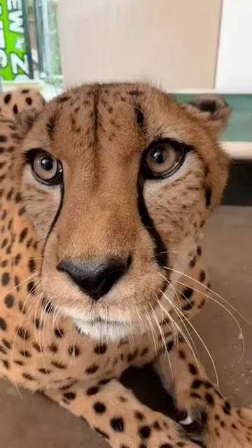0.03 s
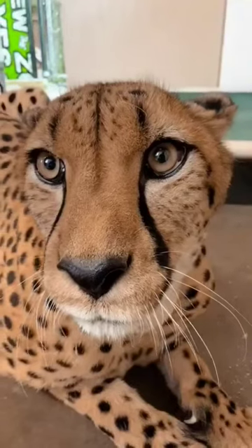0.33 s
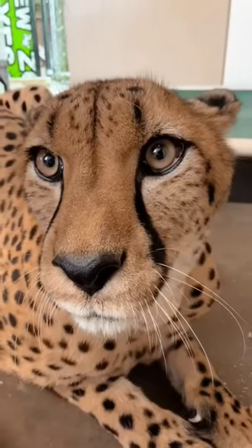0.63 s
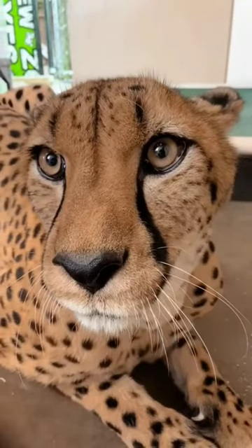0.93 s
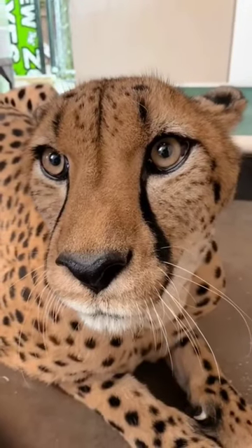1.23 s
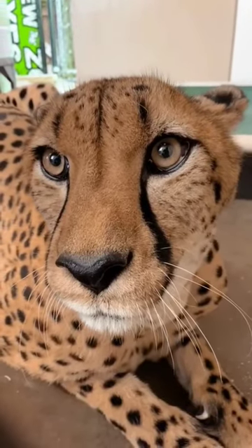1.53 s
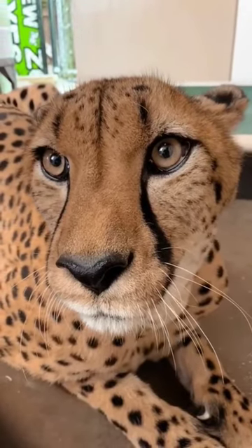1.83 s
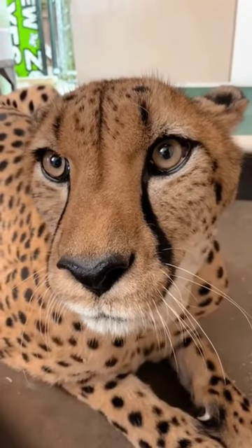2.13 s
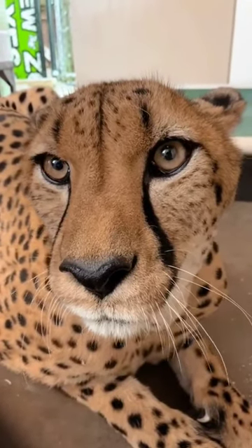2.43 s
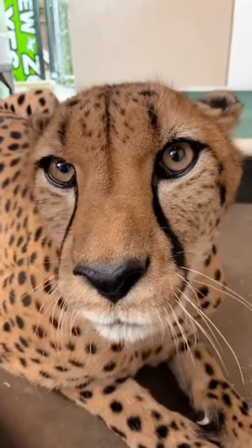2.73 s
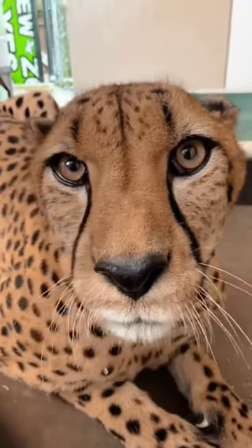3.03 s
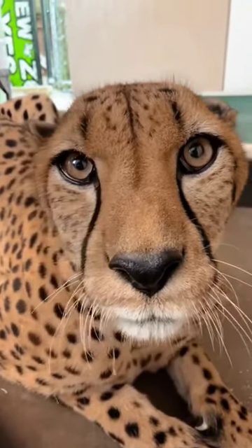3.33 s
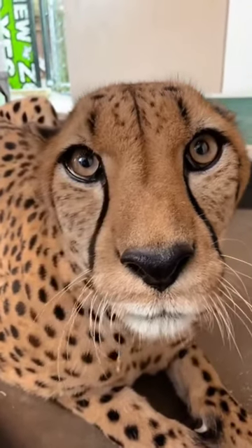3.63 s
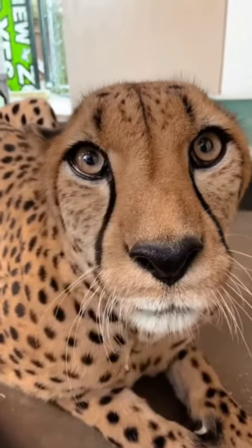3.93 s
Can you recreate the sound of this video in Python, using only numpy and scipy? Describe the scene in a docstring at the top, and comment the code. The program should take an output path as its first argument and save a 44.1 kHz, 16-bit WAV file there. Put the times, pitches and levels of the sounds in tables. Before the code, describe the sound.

Deep, rattling purring comes from a cheetah right by the microphone: a strong breath in with a few wet clicks, a long, gentler humming breath out, and a strong breath in again. Nearby walls add a slight echo.

```python
"""A cheetah purring

A cheetah purrs close by in a small hard-walled enclosure: a loud stroke of breath in, a long soft
stroke out, and in again. Its voice box snaps 22-26 times a second. Each of these pulses is a short
falling note in the throat, a puff of rasping air and a chest thump. On the slower outward stroke
the third harmonic (three times the pulse rate) meets a deep resonance and swells into a hum."""
import sys
import numpy as np
from scipy import signal
from scipy.fft import rfft, irfft, next_fast_len
from scipy.io import wavfile
from scipy.ndimage import uniform_filter1d

SR = 44100
rng = np.random.default_rng(int(sys.argv[2]) if len(sys.argv) > 2 else 0)


def inscribe(sig):
    """Save sig as 16-bit PCM at rate SR to the path in sys.argv[1].

    A 1-D sig is mono; a 2-D sig holds one channel per row.
    Samples are clipped to [-1, 1] before scaling.
    """
    pcm = np.round(np.clip(np.atleast_2d(sig).T, -1, 1) * 32767)
    wavfile.write(sys.argv[1], SR, pcm.astype(np.int16))


N = 176400  # 4 seconds
PULSE_TIME = np.arange(-1400, 1800) / SR  # seconds before and after one pulse


def amp(db):
    """Turns decibels into a gain."""
    return 10 ** (np.asarray(db) / 20)


def at_pitch(table, hz):
    """Looks up a table by frequency, blending between its rows on a log scale."""
    row_hz, value = np.transpose(table)
    return np.interp(np.log(hz + 1), np.log(row_hz + 1), value)


def add(mix, start_s, sound):
    """Mixes a sound in at the given time."""
    part = mix[..., max(round(start_s * SR), 0):][..., :sound.shape[-1]]
    part += sound[..., :part.shape[-1]]


def unit_pulse(x):
    """Scales a pulse so that 23 of them a second have an average (rms) level of 1."""
    return x / np.sqrt(np.sum(x ** 2) * 23 / SR + 1e-20)


def colour(x, table, size=4096):
    """Gives a sound a tone colour. The table sets the filter's shape, not its overall gain."""
    log_gain = np.log(amp(at_pitch(table, abs(np.fft.fftfreq(size, 1 / SR)))))
    spectrum = np.exp(np.conj(signal.hilbert(log_gain)))  # rings after a sound, never before
    taps = np.fft.ifft(spectrum).real[:size // 2]
    return signal.oaconvolve(np.atleast_2d(x), taps[None] / np.linalg.norm(taps), axes=1)[:, :N]


def swell(at_s, rise_s, fall_s):
    """The loudness of one puff: a rounded rise, then a fade."""
    t = PULSE_TIME - at_s
    return np.exp(-(np.minimum(t, 0) / rise_s) ** 2 - np.maximum(t, 0) / fall_s)


def air(likeness=0.83):
    """The noise of swirling air, nearly alike on the left and right."""
    shared, side = rng.standard_normal((2, N))
    return np.sqrt((1 + likeness) / 2) * shared + np.sqrt((1 - likeness) / 2) * np.array([side, -side])


def muffled(x):
    """Fur and flesh let only the low sounds out of the body."""
    return signal.sosfilt(signal.butter(2, 1500, fs=SR, output="sos"), x)


# How long the walls echo. Each row: frequency in Hz, seconds to fade by 60 dB.
ECHO_FADE = [(100, 0.55), (350, 1), (2000, 0.72), (12000, 0.29)]


def enclosure(x, delay_s=0.0072):
    """Scattered echoes from near walls, each pitch dying at its own speed."""
    count = SR // 40
    echoes = np.zeros((2, SR))
    arrivals = round(delay_s * SR) + 20 * np.arange(count) + rng.integers(0, 20, (2, count))
    np.put_along_axis(echoes, arrivals, rng.choice([-1., 1.], arrivals.shape), 1)
    hz, t, bands = signal.stft(echoes, SR, nperseg=256)
    likeness = at_pitch([(200, 1.0), (400, 0.69), (800, 0.13)], hz)[:, None]
    bands[1] = likeness * bands[0] + np.sqrt(1 - likeness ** 2) * bands[1]  # lows reach both sides alike
    fade = amp(-60 * t / at_pitch(ECHO_FADE, hz)[:, None])
    tail = signal.istft(bands * fade, SR, nperseg=256)[1]
    return signal.fftconvolve(x, tail / np.linalg.norm(tail[0]), axes=1)[:, :N]


# How loud the breath is. Each row: time in seconds, level in dB.
BREATH_LEVEL = [(0.301, -52), (1.0, -47.5), (1.201, -59), (2.849, -50.5), (3.05, -64), (3.3, -52.5)]
# The tone of the breath. Each row: frequency in Hz, relative level in dB.
BREATH_COLOUR = [(330, 0.5), (800, -8), (1300, -19.5), (2000, -18), (2400, -29.5), (3800, -26), (4500, -40),
                 (15000, -55)]


def breath():
    """A soft, steady rush of air that joins the strokes."""
    level_db = np.interp(np.arange(N) / SR, *np.transpose(BREATH_LEVEL))
    return amp(level_db) * colour(air(), BREATH_COLOUR)


# How hard the pulses push the hum. Each row: time in seconds, relative strength in dB.
HUM_PUSH = [(.3, -36.5), (.86, -38), (.93, -24), (1.03, -29.5), (1.22, -43), (1.4, -32), (1.85, -28.5),
            (2.5, -29.5), (2.88, -27), (2.93, -34), (4, -39)]
# A higher tone that sinks and swells as the outward stroke ends.
# Each row: time in seconds, pitch in Hz, push in dB compared with the deep hum's.
HUM_OVERTONE = [(1.4, 172, -9), (2.6, 168, -13), (2.74, 160, -5), (2.95, 160, -8)]


def hum(pulse_times, deep_hz=66.15, deep_width_hz=4.76, overtone_width_hz=12, lag_s=0.0048):
    """The pulses keep a deep resonance and a weaker, drifting overtone ringing."""
    t = np.arange(N) / SR
    pushes = np.zeros(N)
    for s in pulse_times:
        add(pushes, s + lag_s, amp([np.interp(s, *np.transpose(HUM_PUSH))]))
    ring = np.exp(-np.pi * deep_width_hz * t) * np.sin(2 * np.pi * deep_hz * t)
    deep = signal.oaconvolve(pushes, ring)[:N]
    row_s, hz, db = np.transpose(HUM_OVERTONE)
    spin = np.exp(2j * np.pi * np.cumsum(np.interp(t, row_s, hz)) / SR)
    decay = np.exp(-np.pi * overtone_width_hz / SR)
    overtone = spin * signal.lfilter([1], [1, -decay], pushes * amp(np.interp(t, row_s, db)) / spin)
    return muffled(amp(2.0) * (deep + overtone.imag))


# The tone of the chest. Each row: frequency in Hz, relative level in dB.
CHEST_COLOUR = [(25, -34), (43, 1), (62, 1), (85, 6.5), (120, 1), (165, 2), (225, -14), (400, -26),
                (1500, -82.5)]


def chest(thumps, flutter):
    """Thumps and a fluttering rumble, heard through the body."""
    return muffled(colour(thumps + flutter * rng.standard_normal(N), CHEST_COLOUR))


# Sharper snaps on the inward strokes.
# Each row: time in seconds, then relative levels in dB of the burst and of the knock.
WET_SNAPS = [(0.3037, -17.5, -18.5), (0.4311, -18.5, -23.5), (0.5555, -20.5, -23), (0.639, -26.5, -21),
             (3.2534, -20.5, -32.5), (3.62, -20.5, -28.5), (3.701, -22, -23)]


def wet_snaps(knock_hz=720):
    """Brief, bright, wet bursts on the hardest pulses, each with a hollow knock in the mouth."""
    bursts, knocks = np.zeros((2, N))
    shape = swell(at_s=0, rise_s=.0019, fall_s=.0021)
    knock = shape * np.sin(2 * np.pi * knock_hz * PULSE_TIME)
    for s, burst_db, knock_db in WET_SNAPS:
        add(bursts, s + PULSE_TIME[0], amp(burst_db) * shape)
        add(knocks, s + PULSE_TIME[0], amp(knock_db) * knock)
    bright = [(400, -26.5), (1050, 10), (2000, 6.5), (4300, 10.5), (5500, -18.5), (7500, -19.5),
              (9200, -16.5), (10300, -9), (13500, -28), (15500, -34.5)]
    return knocks + amp(-13.5) * colour(bursts * air(), bright)


def wet_air(grain_db=4.5):
    """Air swirling through a moist passage, broken into grains under a millisecond long."""
    grain = uniform_filter1d(rng.standard_normal(N), size=30)
    gain = amp(grain_db * grain / grain.std())
    return air() * gain / np.sqrt(np.mean(gain ** 2))


def shifting_passage(x, depth_db=2.4):
    """The moist passage keeps changing shape, so random peaks come and go in the tone."""
    bands = signal.stft(x, nperseg=256)[2]
    patches = uniform_filter1d(rng.standard_normal(bands.shape[1:]), size=4, axis=0)  # across pitch
    patches = uniform_filter1d(patches, size=7, axis=1)  # across time
    gain = amp(depth_db * patches / patches.std())
    return signal.istft(bands * gain / np.sqrt(np.mean(gain ** 2)), nperseg=256)[1][:, :N]


def rasp(puffs, rasp_colour):
    """Puffs of rasping air, and a smoother hiss from the nose that follows their average strength."""
    average = np.sqrt(abs(uniform_filter1d(puffs ** 2, size=1900)))
    treble_only = signal.butter(3, 9000, "highpass", fs=SR, output="sos")
    hiss = signal.sosfilt(treble_only, average * rng.standard_normal((2, N)))
    return shifting_passage(colour(puffs * wet_air() + amp(1.5) * hiss, rasp_colour))


def note(hz, glide, glide_s, loudness):
    """The ring after a snap of the voice box: it starts high and settles on its pitch."""
    settling = np.exp(np.clip((PULSE_TIME + glide_s) / glide_s * 2, -30, 30))
    turns = np.cumsum(hz * (1 + glide / (1 + settling))) / SR
    return loudness * np.cos(2 * np.pi * (turns - np.interp(0, PULSE_TIME, turns)))


def pulse_in(chance):
    """One inward pulse: air leaks in, swells and is cut off with a click."""
    detune = .028 * chance[0]
    throat_note = note(354 * (1 + detune), glide=0.033, glide_s=0.00054,
                       loudness=swell(at_s=0.00099, rise_s=0.004, fall_s=0.0046))
    mouth_note = note(735 * (1 - detune), glide=0.02, glide_s=0.009,
                      loudness=swell(at_s=-0.00092, rise_s=0.0024, fall_s=0.00086))
    leak = amp(4 * chance[1]) * swell(at_s=-0.016 + 0.0032 * chance[2], rise_s=0.0045, fall_s=0.017)
    mouth_puff = swell(at_s=-0.00024, rise_s=0.0026, fall_s=0.0019) + 0.1 * leak
    rasp_puff = swell(at_s=-0.0016, rise_s=0.0067, fall_s=0.0027) + 0.13 * leak
    click_s, click_size = -0.0008 + .001 * chance[2], 0.55
    return throat_note, amp(-8.5) * unit_pulse(mouth_note), mouth_puff, rasp_puff, click_s, click_size


def pulse_out(chance):
    """One outward pulse: an opening click, falling notes in throat and mouth, a small closing puff."""
    tuning = 1 + .014 * chance[0]
    throat_note = note(315 * tuning, glide=0.35, glide_s=0.0044,
                       loudness=swell(at_s=-0.0012, rise_s=0.0017, fall_s=0.0041))
    mouth_note = note(760 * tuning, glide=0.12, glide_s=0.005,
                      loudness=swell(at_s=-0.0032, rise_s=0.001, fall_s=0.0028))
    opening = swell(at_s=-0.0024, rise_s=0.0075, fall_s=0.0021)
    closing = swell(at_s=0.026, rise_s=0.0066, fall_s=0.015)
    mouth_puff, rasp_puff = opening + closing / 2, opening + 0.55 * closing
    click_s, click_size = -0.0044, 1.3
    return throat_note, amp(-3.5) * unit_pulse(mouth_note), mouth_puff, rasp_puff, click_s, click_size


def voice_box_times(rate, end_s):
    """The moments when the voice box snaps, once in each cycle of its changing rate."""
    t = np.arange(rate[0][0], end_s, 1 / SR)
    cycles = np.cumsum(np.interp(t, *np.transpose(rate))) / SR
    return np.interp(np.arange(int(cycles[-1]) + 1), cycles, t)


# The tone of air puffing through the mouth. Each row: frequency in Hz, relative level in dB.
MOUTH_COLOUR = [(150, -33), (300, -4.5), (540, -7.5), (770, -2), (900, -26), (1080, -11.5), (1300, -30),
                (4000, -69)]


def stroke(rate, strength, pulse, rasp_colour, end_s, thump_lead_s, flutter_db):
    """One breath of purring, each pulse a little different. Gives the sound and the pulse times."""
    notes, mouth_puffs, rasp_puffs, clicks, thumps, flutter = np.zeros((6, N))
    row_s, *levels = np.transpose(strength)
    times = voice_box_times(rate, end_s)
    tick = unit_pulse(np.ones(1))
    flutter_shape = unit_pulse(swell(at_s=0, rise_s=0.045, fall_s=0.048))
    played = []
    for s, (late, loud, raspy, heavy, *chance) in zip(times, rng.standard_normal((len(times), 7))):
        throat_db, mouth_db, rasp_db, thump_db = [np.interp(s, row_s, db) for db in levels]
        throat_note, mouth_note, mouth_puff, rasp_puff, click_s, click_size = pulse(chance)
        s += .0003 * late
        played.append(s)
        start = s + PULSE_TIME[0]
        add(notes, start, amp(throat_db + .7 * loud) * unit_pulse(throat_note))
        add(notes, start, amp(mouth_db + 1.2 * raspy) * mouth_note)
        add(mouth_puffs, start, amp(mouth_db + .7 * loud) * unit_pulse(mouth_puff))
        rasp_gain = amp(rasp_db + 1.2 * raspy) / np.hypot(1, click_size)  # shared by puff and click
        add(rasp_puffs, start, rasp_gain * unit_pulse(rasp_puff))
        add(clicks, s + click_s, rasp_gain * click_size * tick)
        thump = amp(thump_db + .7 * heavy) * tick
        add(thumps, s - thump_lead_s, thump)
        add(thumps, s - thump_lead_s + 0.02323, 0.16 * thump)  # a weaker thump on closing
        add(flutter, start, amp(thump_db + flutter_db) * flutter_shape)
    mouth = amp(-5.5) * colour(mouth_puffs * air(), MOUTH_COLOUR)
    voice = notes + mouth + rasp(rasp_puffs, rasp_colour) + colour(clicks, rasp_colour)
    return voice + chest(thumps, flutter), played


def softer_hiss(table, cut_db):
    """Turns down the hiss of the nose, above 6000 Hz, in a tone colour."""
    return [(hz, db - cut_db * (hz > 6000)) for hz, db in table]


# How fast the voice box snaps in each stroke. Each row: time in seconds, pulses per second.
FIRST_IN_RATE = [(0.3045, 23.48), (0.43, 23.73), (0.52, 24.45), (0.68, 23.5), (0.8, 24.44), (0.95, 21.9),
                 (1.23, 21.79)]
OUT_RATE = [(1.2552, 22.48), (1.45, 21.49), (1.85, 21.98), (2.2, 21.9), (2.55, 22.08), (2.8, 22.79),
            (2.94, 24.43)]
SECOND_IN_RATE = [(3.0889, 24.58), (3.25, 23.89), (3.31, 25.62), (3.42, 24.04), (3.6, 24.46), (3.68, 25.11),
                  (3.85, 23.83), (3.92, 26.12), (4, 23.32)]
# How strong each stroke is. Each row: time in seconds, then relative levels in dB of the
# throat note, the mouth, the rasp and the chest thump.
FIRST_IN_STRENGTH = [(0.302, -27, -32, -48.5, -39), (0.468, -28, -34.5, -48, -45.5),
                     (0.601, -27, -36.5, -44.5, -45.5), (0.849, -26, -34, -49.5, -39),
                     (0.94, -43.5, -37, -50, -60), (1.029, -36.5, -42, -51, -65),
                     (1.131, -48.5, -61, -77, -43)]
OUT_STRENGTH = [(1.25, -45.5, -54.5, -76, -42), (1.36, -41, -52.5, -68, -42),
                (1.649, -46.5, -53.5, -65.5, -37), (1.92, -40.5, -52, -64.5, -36.5),
                (2.25, -39.5, -53.5, -60.5, -36), (2.698, -39, -50.5, -55, -40.5),
                (2.871, -37, -51, -55.5, -33.5), (2.93, -44.5, -55, -66.5, -38.5),
                (2.97, -53, -74, -92.5, -38)]
SECOND_IN_STRENGTH = [(3.09, -33.5, -40, -56, -53.5), (3.17, -26, -34, -54.5, -40.5),
                      (3.252, -31, -39, -47.5, -44), (3.33, -26, -35.5, -50, -42),
                      (3.6, -24.5, -33, -47, -42.5), (3.83, -24.5, -34, -49, -42.5),
                      (3.94, -30.5, -36, -50.5, -49.5), (3.99, -29, -28, -37.5, -39)]
# The tone of the rasp going in and going out. Each row: frequency in Hz, relative level in dB.
IN_RASP_COLOUR = [(500, -52), (1000, -15), (1250, -0.5), (1600, 0), (1970, 15.5), (2200, 0.5), (3200, -1.5),
                  (3550, 1.5), (3850, -2), (4250, 4), (4700, -12), (5200, -20), (5900, -14.5),
                  (7000, -57.5), (8100, -24.5), (8900, -42.5), (10200, -16), (11500, -34.5), (12900, -22.5),
                  (15000, -60.5)]
OUT_RASP_COLOUR = [(500, -43.5), (1050, 7), (1650, 3), (1980, 17.5), (2200, -3.5), (2550, 0), (2900, -12),
                   (3400, -2), (3850, 0), (4300, -38.5), (9300, -34.5), (12000, -54)]


def purr():
    """The cheetah breathes in, out and in again. Gives the sound and all the pulse times."""
    sounds, times = zip(
        stroke(FIRST_IN_RATE, FIRST_IN_STRENGTH, pulse_in, softer_hiss(IN_RASP_COLOUR, cut_db=7),
               end_s=1.23, thump_lead_s=.005, flutter_db=-1),
        stroke(OUT_RATE, OUT_STRENGTH, pulse_out, OUT_RASP_COLOUR,
               end_s=3.03, thump_lead_s=-0.0032, flutter_db=-4),
        stroke(SECOND_IN_RATE, SECOND_IN_STRENGTH, pulse_in, softer_hiss(IN_RASP_COLOUR, cut_db=3.5),
               end_s=4.0, thump_lead_s=0.0043, flutter_db=0.5))
    return sum(sounds), np.concatenate(times)


def scene():
    """The purr and its wet snaps, their echo, the hum and the breath."""
    purring, pulse_times = purr()
    cheetah = purring + wet_snaps()
    return cheetah + amp(-14) * enclosure(cheetah) + hum(pulse_times) + breath()


# How the sound leans to one side. Each row: frequency in Hz, left level minus right level in dB.
LEFT_RIGHT_BALANCE = [(160, 0), (260, -1.5), (400, -4.5), (710, -4.8), (1160, -4), (1910, -1)]


def record(dry):
    """The sound starts suddenly, leans right in the middle pitches and loses its extreme lows and highs."""
    fade_in = np.clip((np.arange(N) / SR - .289) / .004, 0, 1)
    low_cut = signal.butter(3, 36, "highpass", fs=SR, output="sos")
    x = signal.sosfilt(low_cut, dry * fade_in)
    size = next_fast_len(N + 4096)
    lean_db = at_pitch(LEFT_RIGHT_BALANCE, np.fft.rfftfreq(size, 1 / SR)) / 2
    stereo = irfft(rfft(x, size) * amp([lean_db, -lean_db]), size)[:, :N]
    high_cut = signal.firwin(511, 15400, window=("kaiser", 9), fs=SR)
    return signal.oaconvolve(stereo, high_cut[None], "same")


dry = scene()
out = record(dry)
inscribe(out)
```